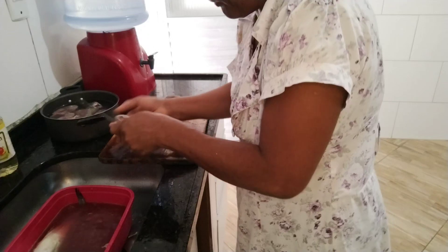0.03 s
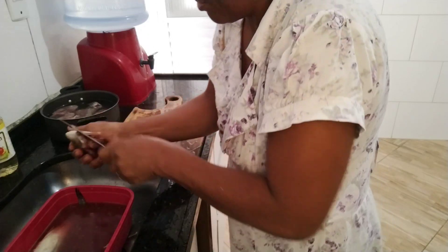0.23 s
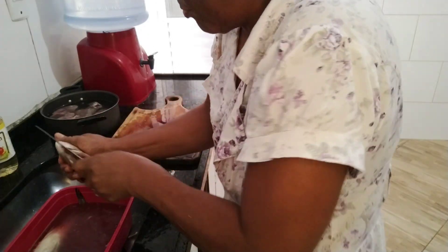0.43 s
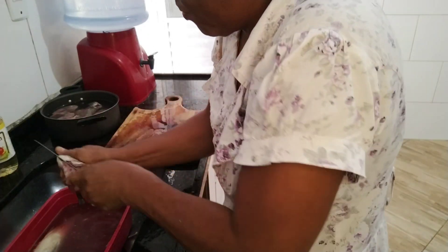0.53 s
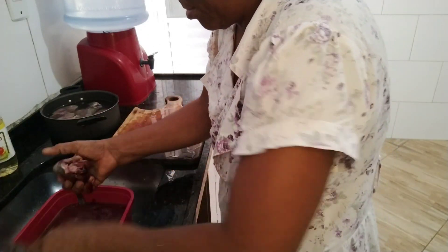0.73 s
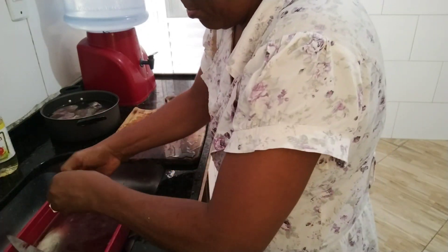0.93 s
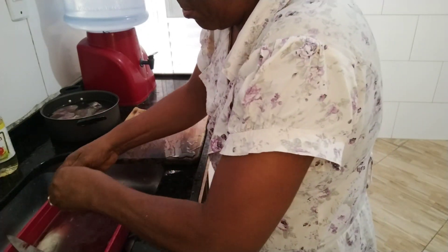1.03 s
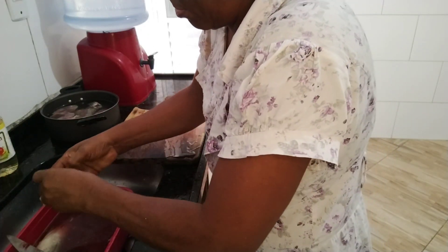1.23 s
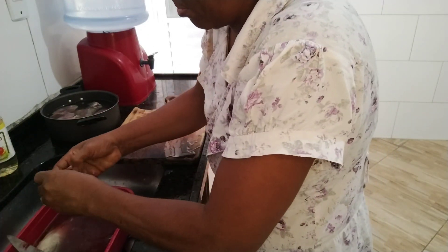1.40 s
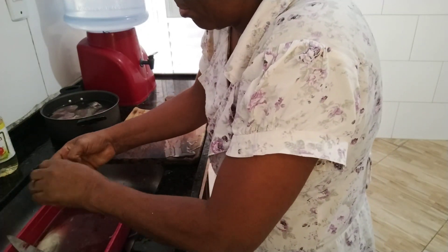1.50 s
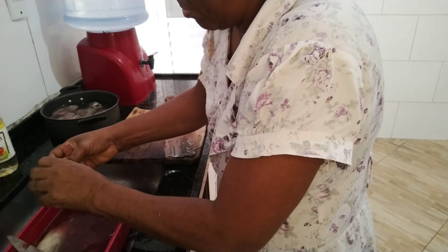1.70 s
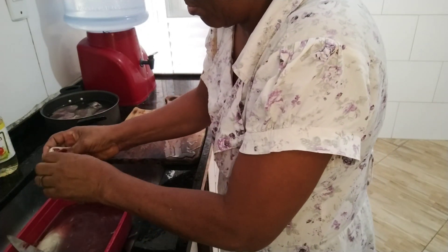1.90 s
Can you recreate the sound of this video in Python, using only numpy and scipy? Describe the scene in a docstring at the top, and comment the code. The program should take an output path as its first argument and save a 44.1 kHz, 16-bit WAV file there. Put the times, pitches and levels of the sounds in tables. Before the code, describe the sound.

A knife cuts wet food in short, crunching strokes from about 0.2 to 0.6 seconds, with small squelches and finger rubbing. At 0.7 the piece splats into a plastic tray, which thumps and judders until 0.9, the loudest moment. A sharp clack comes near 1.0. Soft, hollow nudges follow from 1.1 to 1.6, then two faint, dull bumps around 1.9. It all sounds close, over low kitchen room noise.

```python
"""At a kitchen sink, a knife rasps through a piece of wet food in short crunching strokes:
fibres tear and snap, air pockets squelch, wet fingers rub. The piece drops with a splat into a
plastic tray, which thumps and judders in the basin. A sharp clack, a few soft, hollow nudges of
the tray and dull bumps on the counter follow; tiled walls answer over a low room noise."""
import sys
import numpy as np
from scipy import signal
from scipy.fft import rfft, irfft, next_fast_len
from scipy.io import wavfile
from scipy.ndimage import map_coordinates

SR = 44100
rng = np.random.default_rng(int(sys.argv[2]) if len(sys.argv) > 2 else 0)


def persist_wave(psi):
    """Save psi, clipped to +-1, as 16-bit WAV."""
    counts = np.round(np.clip(psi, -1, 1) * 32767).astype(np.int16)
    wavfile.write(sys.argv[1], SR, np.atleast_2d(counts).T)


N = 85995

# colour of rubbing, shared by fingers and nudges: (frequency [Hz], level [dB])
RUB_COLOUR = [(200, 1.5), (500, 4.5), (1000, 2.5), (2000, 0.5), (5000, -3.5), (9000, -4), (15000, -8)]


def amp(db):
    """Decibels to gain."""
    return 10 ** (np.asarray(db) / 20)


def unit(x):
    """Scale to rms 1."""
    return x / np.sqrt(np.mean(x ** 2) + 1e-20)


def along(points, hz):
    """Read (Hz, value) points on a log frequency axis."""
    f, v = np.transpose(points)
    return np.interp(np.log(hz + 1), np.log(f + 1), v)


def curve(rows):
    """Join (s, value) points, one value per sample."""
    return np.interp(np.arange(N) / SR, *np.transpose(rows))


def since(s):
    """Seconds since s, zero before it."""
    return np.maximum(np.arange(N) / SR - s, 0)


def envelope(s, rise, hold, t60):
    """Linear rise from s, hold, then a release that falls 60 dB in t60; all in seconds."""
    return np.minimum(since(s) / rise, 1) * amp(-60 * since(s + rise + hold) / t60)


def filtered(x, response):
    """Shape x with a frequency response."""
    size = next_fast_len(N + 8192)
    return irfft(rfft(x, size) * response(np.fft.rfftfreq(size, 1 / SR)), size)[..., :N]


def resonance(f, hz, width_hz):
    """Band-pass response of one resonance at hz."""
    return 1j * f * width_hz / (hz * hz - f * f + 1j * f * width_hz)


def stereo(pair, colour):
    """Colour two unrelated signals and blend them: bass centred, treble wide; rms 1."""
    # likeness of left and right: (frequency [Hz], correlation)
    likeness = [(40, 0.98), (130, 0.55), (300, 0.74), (600, 0.47), (1200, 0.033), (12000, .05)]

    def mid_and_side(hz):
        angle = np.arccos(np.clip(along(likeness, hz), -1, 1)) / 2
        return amp(along(colour, hz)) * [np.cos(angle), np.sin(angle)]

    mid, side = filtered(pair, mid_and_side)
    return unit(np.array([mid + side, mid - side]))


def noise(colour):
    """Smooth, coloured stereo noise."""
    return stereo(rng.standard_normal((2, N)), colour)


def grains(per_s, spread_db):
    """Random tiny impulses of uneven size, in two channels."""
    hits = rng.random(N) < per_s / SR
    sizes = amp(spread_db * np.clip(rng.standard_normal(N), -2, 2))
    return unit(hits * sizes * rng.standard_normal((2, N)))


def tone(s, hz, drift):
    """A sine starting at s, its pitch wavering by about the fraction drift."""
    t = since(s)
    waver = map_coordinates(rng.standard_normal(400), [t * 150], order=1)
    return np.sin(2 * np.pi * hz * np.cumsum((t > 0) * (1 + drift * waver)) / SR)


def ring(s, hz, t60, rise, drift):
    """One damped mode, struck at s."""
    return tone(s, hz, drift) * amp(-60 * since(s) / t60) * (1 - np.exp(-since(s) / rise))


def room_tone():
    """A steady bed of low rumble and faint hiss."""
    # colour of the room's air: (frequency [Hz], level [dB])
    air_colour = [(25, -1.5), (45, -3.5), (75, -0.5), (130, -3), (220, -9), (330, -9), (520, -8.5),
                  (760, -16), (1100, -19), (1500, -22.5), (2100, -18.5), (2650, -15), (3300, -22.5),
                  (5000, -21.5), (7500, -24), (9200, -19), (10200, -13.5), (11200, -23), (14500, -25),
                  (15600, -29)]
    return amp(-38.5) * noise(air_colour)


def wet_food():
    """Wet fingers rub the food while air pockets pop under the squeeze."""
    # fader ride of the rubbing: (time [s], level [dB])
    rub_levels = [(0.0, -34.5), (0.26, -40.5), (0.39, -35), (1.014, -39), (1.302, -50.5), (1.95, -54.5)]
    # squelching air pockets: (time [s], pitch [Hz], level [dB], t60 [s])
    pockets = [(.256, 1710, -24, 0.054), (.326, 1125, -24, 0.038), (.417, 1815, -15, 0.075),
               (.42, 1655, -20, 0.061), (.503, 1280, -20.5, 0.033)]
    pops = sum(amp(db) * ring(s, hz, t60, rise=0.0015, drift=0.035) for s, hz, db, t60 in pockets)
    rubbing = stereo(grains(per_s=2500, spread_db=3), RUB_COLOUR)
    return pops + amp(curve(rub_levels) - 2) * rubbing


def knife():
    """Each stroke tears a run of fibres through a resonance that changes with the grip; a few snap."""
    # cuts: (time [s], rise [s], hold [s], level [dB], resonance [Hz], resonance level [dB])
    strokes = [(0.178, 0.027, 0.012, -33, 4300, -8), (0.241, 0.0024, 0.013, -19, 8500, -4),
               (0.301, 0.015, 0.0035, -21, 4080, 1.5), (0.338, 0.018, 0.0045, -17.5, 4880, -1.5),
               (.401, 0.0058, 0.016, -18, 8900, -16), (0.441, 0.0035, 0.009, -19.5, 3700, -11.5),
               (0.455, 0.006, 0.0058, -17.5, 10300, 10), (0.482, 0.014, 0.01, -18.5, 7100, 1.5),
               (.526, 0.0067, 0.013, -22, 3740, -5.5), (0.595, .006, 0.021, -35, 7700, -11)]
    # bright colour of tearing fibres: (frequency [Hz], level [dB])
    rasp_colour = [(200, -7.5), (900, -12.5), (1700, -4.5), (2500, -8.5), (3700, -4.5), (6500, -2.5),
                   (9200, 2), (11000, -1.5), (14300, -1), (16000, -9.5)]
    # snapping fibres and wet ticks: (time [s], level [dB])
    snaps = [(0.208, -35), (.2468, -18), (.319, -22), (0.3415, -22), (.4035, -17), (0.42, -10.5),
             (0.4448, -11.5), (0.4978, -19), (0.512, -13), (0.5338, -21), (0.5405, -13), (.559, -20),
             (0.606, -28.5), (0.7027, -9), (1.217, -24.5)]
    cuts = np.zeros((2, N))
    for s, rise, hold, db, hz, peak_db in strokes:
        tear = stereo(grains(per_s=4400, spread_db=3), rasp_colour)
        ringing = unit(filtered(tear, lambda f: resonance(f, hz, width_hz=0.24 * hz)))
        crunch = unit(tear + amp(peak_db - 2) * ringing)
        cuts += amp(db + 1.5) * envelope(s, rise, hold, t60=0.066) * crunch
    snapping = sum(amp(db) * envelope(s, rise=0.00013, hold=0.0006, t60=0.012) for s, db in snaps)
    return cuts + snapping * noise(rasp_colour)


def nudges():
    """Soft pushes wake a wavering hollow note, roughened by rubbing."""
    # pushes on the cupped hand, then on the tray: (time [s], hold [s], pitch [Hz], level [dB])
    presses = [(.362, .012, 490, -35), (.4, .08, 480, -38), (.433, .008, 490, -25), (.503, .01, 490, -34),
               (1.069, .002, 530, -31), (1.081, .012, 530, -28), (1.149, .025, 540, -39),
               (1.265, .04, 540, -42), (1.355, .035, 555, -41), (1.47, .025, 520, -42),
               (1.582, .025, 535, -41)]
    out = np.zeros((2, N))
    for s, hold, hz, db in presses:
        rasp = unit(filtered(noise(RUB_COLOUR), lambda f: resonance(f, hz, width_hz=204) ** 2))
        hollow = tone(s, hz, drift=0.05) + amp(-4.5) * rasp
        out += amp(db + 0.5) * envelope(s, rise=0.0021, hold=hold, t60=0.11) * hollow
    return out * amp([[-1], [1]])  # a little to the right


def counter_bumps():
    """The counter answers each soft bump with one low mode."""
    # dull knocks: (time [s], level [dB])
    bumps = [(0.507, -38), (1.837, -34), (1.91, -33)]
    return sum(amp(db) * ring(s, hz=68.6, t60=0.13, rise=0.005, drift=0.12) for s, db in bumps)


def tray_judder():
    """The tray shakes against the basin in a dense, low rattle."""
    # fader ride of the shaking: (time [s], level [dB])
    shake_levels = [(0.695, -71), (0.701, -23.5), (0.723, -19), (0.797, -18), (0.803, -14.5), (0.865, -26),
                    (0.911, -61), (0.93, -41.5)]
    # boxy colour of the rattle: (frequency [Hz], level [dB])
    rattle_colour = [(88, -29), (150, -0.5), (275, -13), (569, -4.5), (813, -13), (883, -13), (1470, -23.5),
                     (1570, -20), (1930, -26), (3260, -28), (4000, -39), (5200, -60), (8800, -120)]
    start, end = shake_levels[0][0], shake_levels[-1][0]
    shake = amp(curve(shake_levels) + 1.5) * envelope(start, rise=0.01, hold=end - start, t60=0.3)
    return shake * stereo(grains(per_s=1300, spread_db=1.5), rattle_colour)


def tray_thump():
    """The flopping piece pushes the tray and rings it; longer contacts sound duller."""
    # soft landings: (time [s], level [dB], contact time [s])
    flops = [(.703, -21.5, 0.00067), (0.722, -21.5, 0.0021), (.737, -9, 0.0016), (.755, -8, 0.0079),
             (.778, -5, 0.007), (.805, -13.5, 0.0033), (.819, -6, 0.0062), (.836, -20.5, 0.0067),
             (.852, -22, 0.0016), (0.878, -24, 0.0067)]
    # modes of the tray in the basin: (frequency [Hz], level [dB], t60 [s])
    tray_modes = [(63, -7.5, 0.21), (105, -2.5, 0.082), (125.7, 1.5, 0.18), (177.4, -1, 0.11),
                  (230, -4, 0.12), (311, -5, 0.115), (357, 2, 0.078), (447, -4, 0.18), (515.6, -2, .15),
                  (570, -3.5, 0.11), (634, -3, 0.076), (869, -1, 0.062)]
    thump = np.zeros(N)
    for s, db, contact in flops:
        push = np.sin(np.pi * np.minimum(since(s) / contact, 1))
        body = np.zeros(N)
        for hz, mode_db, t60 in tray_modes:
            strength = amp(mode_db + rng.normal(0, 3.1)) / (1 + (hz * contact / 2) ** 2)
            body += strength * ring(s, hz, t60, rise=0.0011, drift=0.04)
        thump += amp(db) * (amp(-9) * push + amp(-5) * body)
    return thump


def splat():
    """The wet surface slaps the tray in two bursts of fine crackle."""
    # wet slaps: (time [s], hold [s], level [dB], t60 [s])
    slaps = [(0.705, 0.034, -19, 0.11), (0.786, 0.01, -27, 0.11)]
    # colour of a slap: (frequency [Hz], level [dB])
    slap_colour = [(300, 5), (900, -9), (1700, 7), (2100, -11), (2900, -5.5), (4200, -5), (7800, -3),
                   (11000, -7.5), (15500, -19)]
    bursts = sum(amp(db) * envelope(s, rise=0.0011, hold=hold, t60=t60) for s, hold, db, t60 in slaps)
    return bursts * stereo(grains(per_s=2500, spread_db=3), slap_colour)


def clack():
    """Something hard, likely the knife, strikes the tray's rim and chatters."""
    # the hit and its rebounds: (time [s], level [dB])
    hits = [(0.9629, -10), (0.9719, -20), (0.9774, -21.5), (1.017, -32)]
    # hard colour of the rim: (frequency [Hz], level [dB])
    rim_colour = [(300, -11.5), (1500, -19), (2200, -8.5), (3150, 3), (3700, -7.5), (4600, -9),
                  (5700, -23.5), (7200, -18.5), (8300, -12.5), (9300, -22.5), (15000, -35)]
    blows = sum(amp(db) * envelope(s, rise=0.00065, hold=0.00053, t60=0.017) for s, db in hits)
    return blows * noise(rim_colour)


def kitchen(direct):
    """Add near reflections from sink and tiles, then a short diffuse tail."""
    # decay of the tail: (frequency [Hz], t60 [s])
    decay = [(100, 0.28), (600, 0.38), (3000, 0.25), (12000, 0.3)]
    # send to the near reflections: (frequency [Hz], level [dB])
    near_send = [(80, -13), (400, -14), (1200, -2.5), (14000, -4)]
    # send to the tail: (frequency [Hz], level [dB])
    tail_send = [(60, -23), (250, -13.5), (700, -10.5), (3000, -5.5), (14000, -16.5)]

    def reflect(impulse, send):
        impulse = impulse / np.linalg.norm(impulse, axis=1, keepdims=True)
        wet = signal.fftconvolve(direct, impulse, axes=1)[:, :N]
        return filtered(wet, lambda hz: amp(along(send, hz)))

    hz, t, bands = signal.stft(rng.standard_normal((2, SR // 2)), SR, nperseg=256)
    tail = signal.istft(bands * amp(-60 * t / along(decay, hz)[:, None]), SR, nperseg=256)[1]
    near = grains(per_s=1500, spread_db=0.5) * envelope(0.001, rise=0.001, hold=0, t60=0.026)
    return direct + reflect(near[:, :SR // 8], near_send) + reflect(tail, tail_send)


def scene():
    """Cutting, drop and handling sound in the kitchen, over its room tone."""
    air = room_tone()
    cutting = knife() + wet_food()
    drop = tray_thump() + tray_judder() + splat()
    handling = clack() + nudges() + counter_bumps()
    return amp(1) * kitchen(cutting + drop + handling) + air


def record(dry):
    """Two slightly unlike microphones shed the rumble; the signal clips and loses its very top."""
    # mismatch of the microphones: (frequency [Hz], left over right [dB])
    tilt = [(100, 1), (300, 2.5), (550, 0), (1200, -1), (5000, -1), (9000, -2), (13500, 1)]
    low_cut_hz, top_hz = 28, 15750

    def microphones(hz):
        low_cut = 1j * hz / (low_cut_hz + 1j * hz)
        return low_cut * amp(np.array([[0.5], [-0.5]]) * along(tilt, hz))

    clipped = np.clip(filtered(dry, microphones), -1, 1)
    return filtered(clipped, lambda hz: hz < top_hz)


dry = scene()
out = record(dry)
persist_wave(out)
```